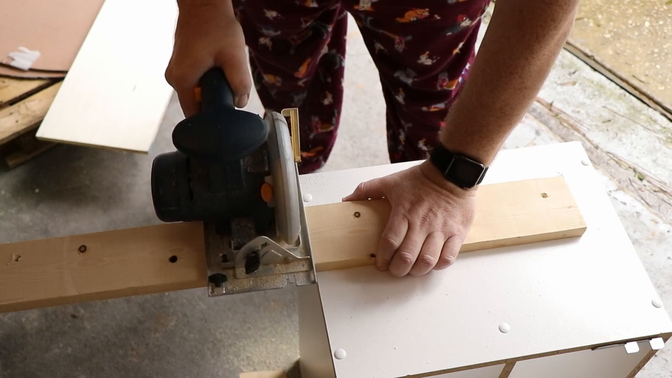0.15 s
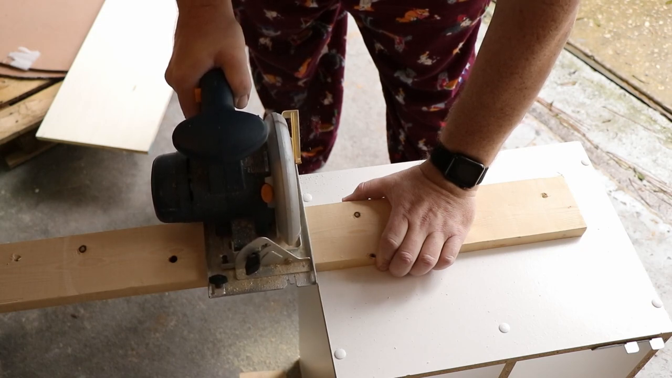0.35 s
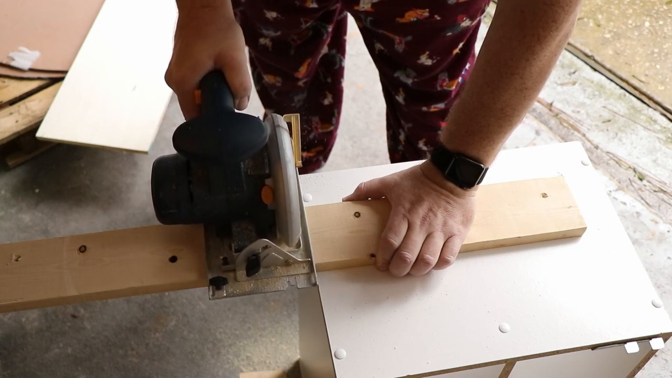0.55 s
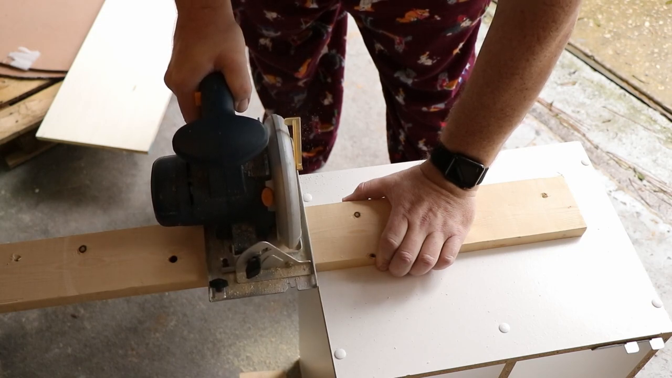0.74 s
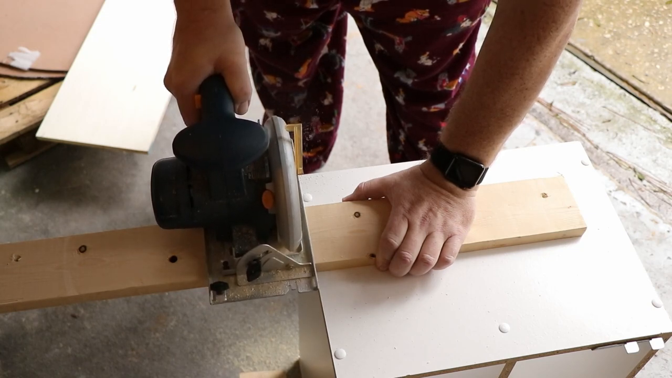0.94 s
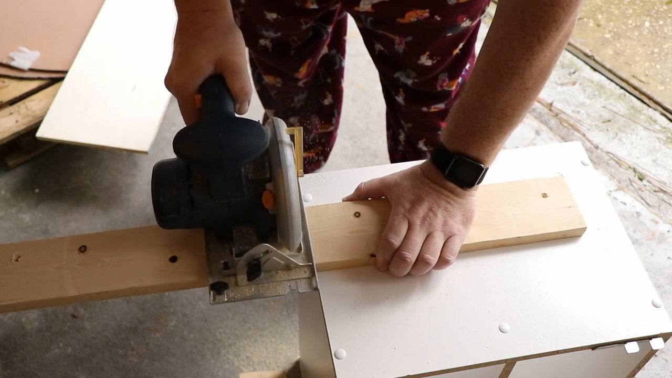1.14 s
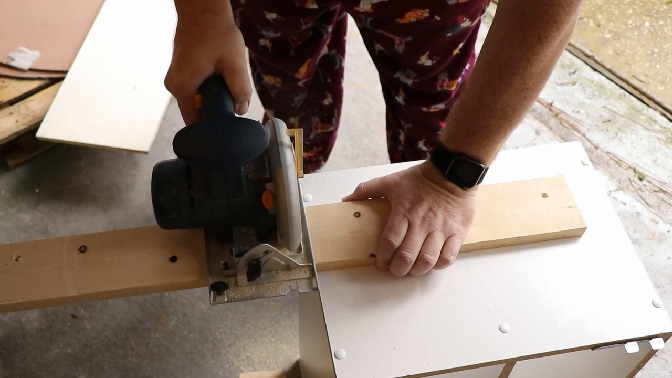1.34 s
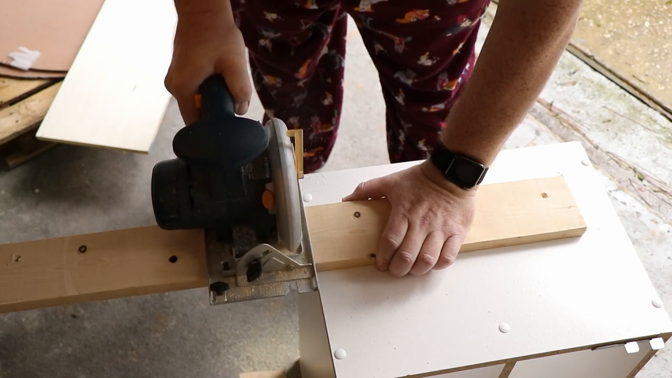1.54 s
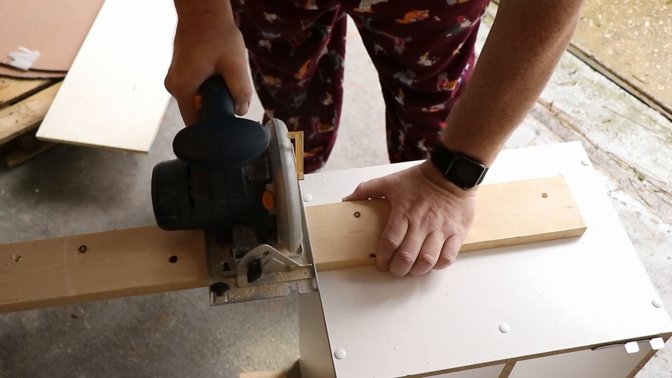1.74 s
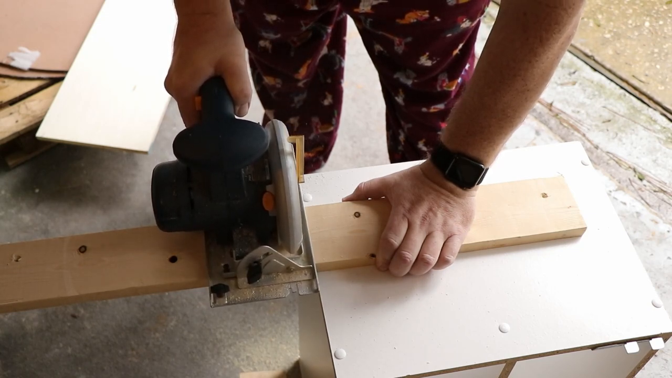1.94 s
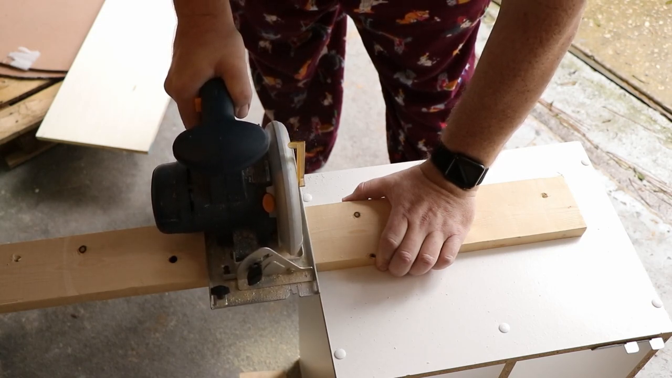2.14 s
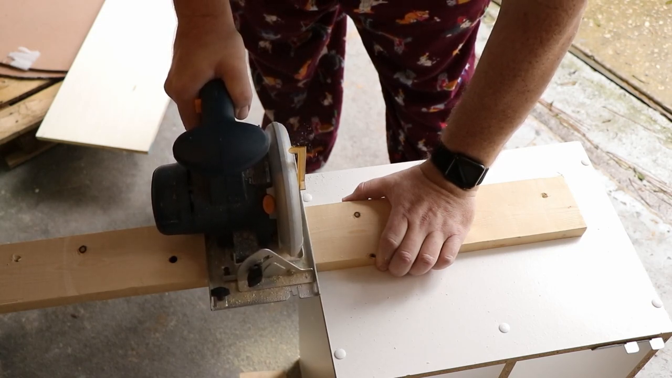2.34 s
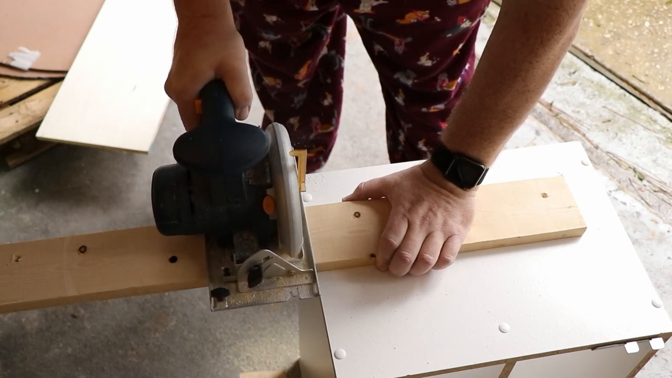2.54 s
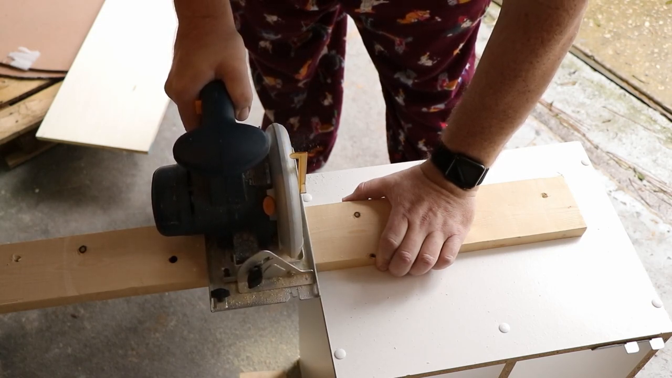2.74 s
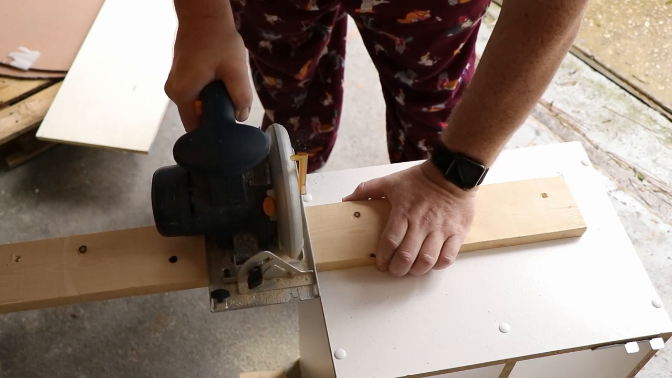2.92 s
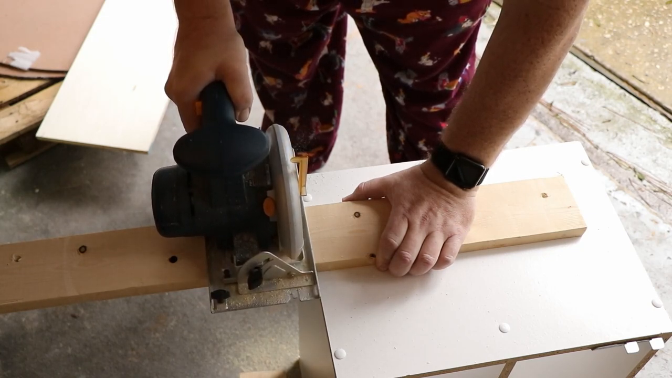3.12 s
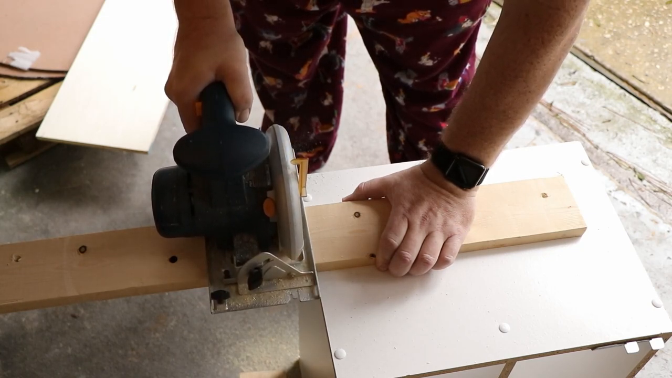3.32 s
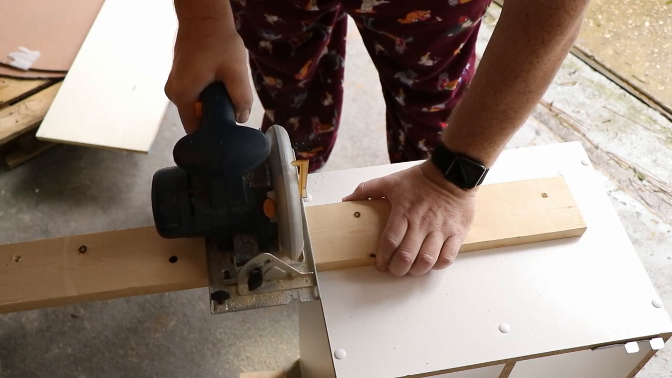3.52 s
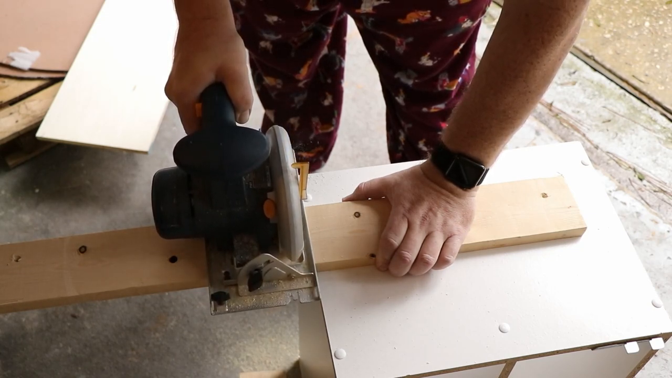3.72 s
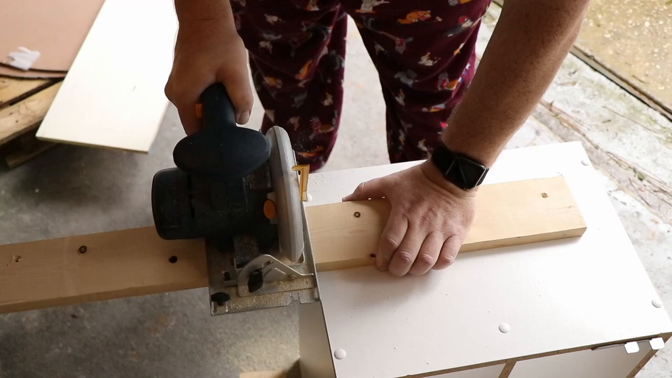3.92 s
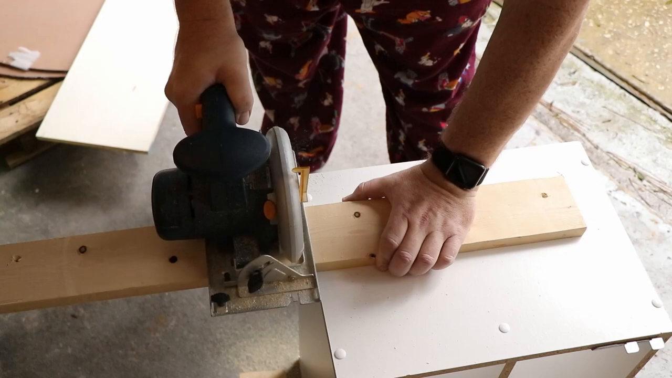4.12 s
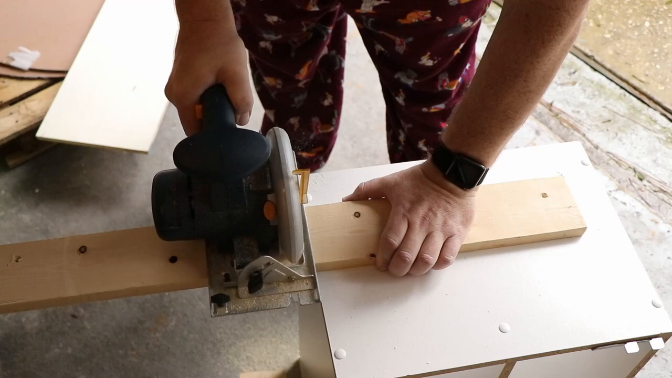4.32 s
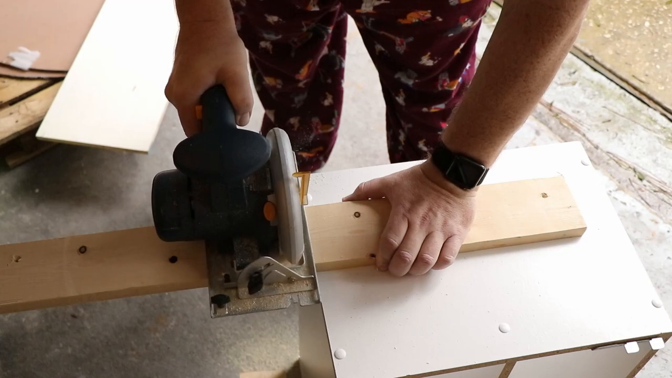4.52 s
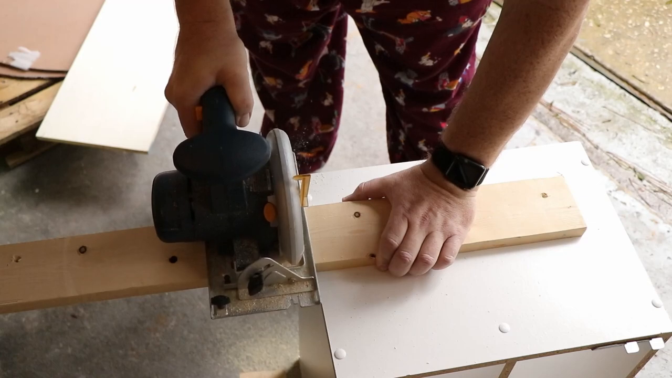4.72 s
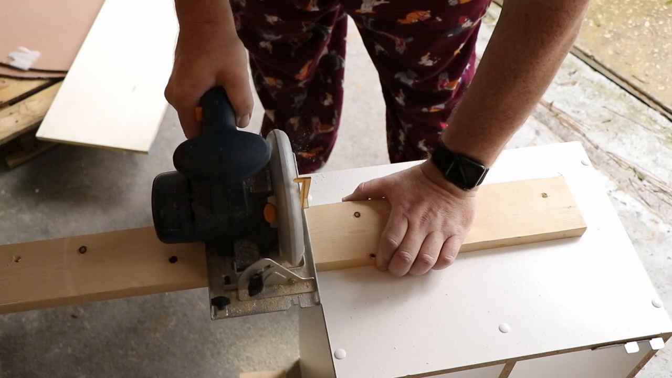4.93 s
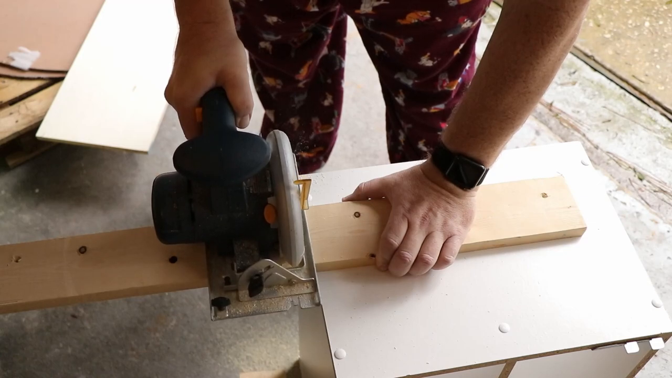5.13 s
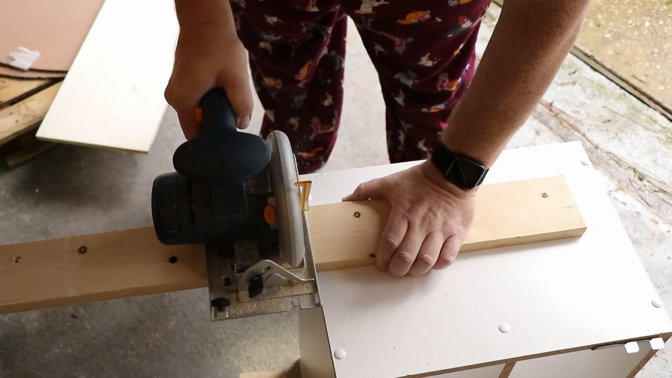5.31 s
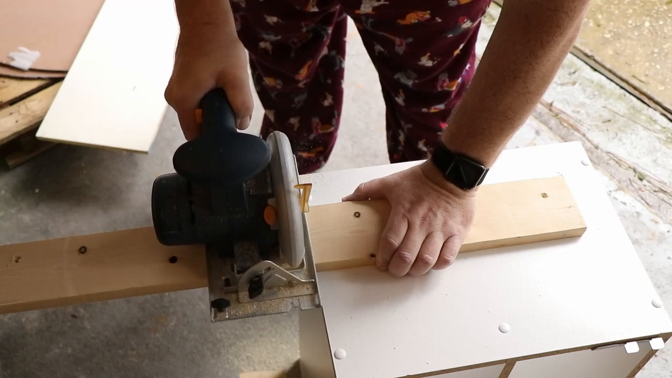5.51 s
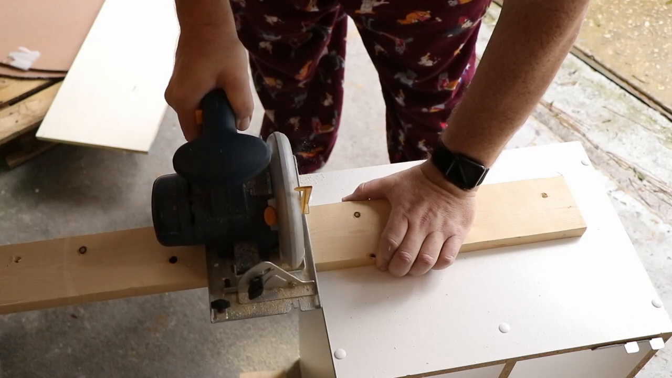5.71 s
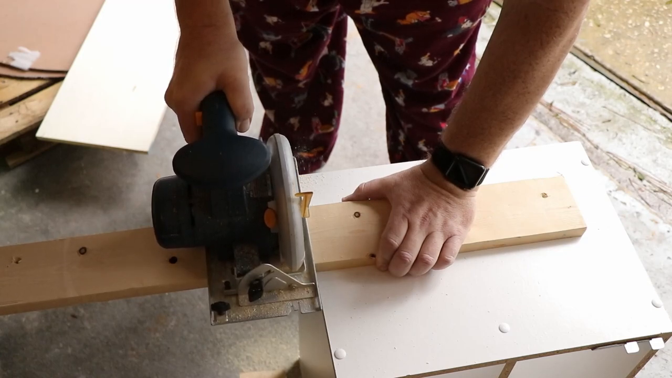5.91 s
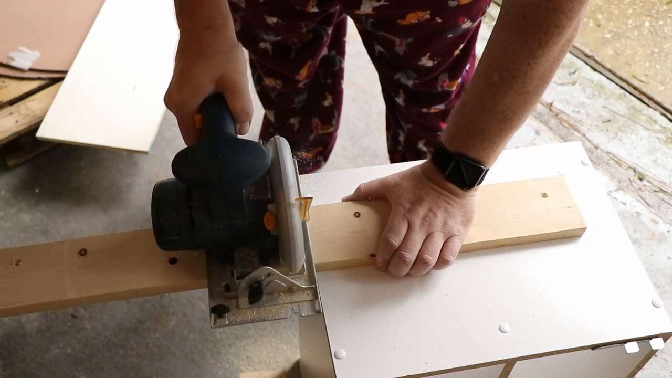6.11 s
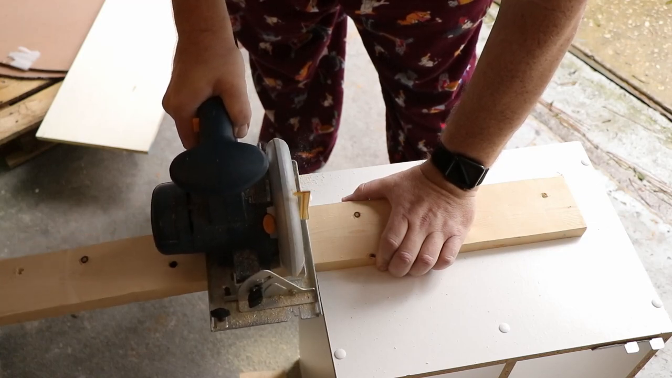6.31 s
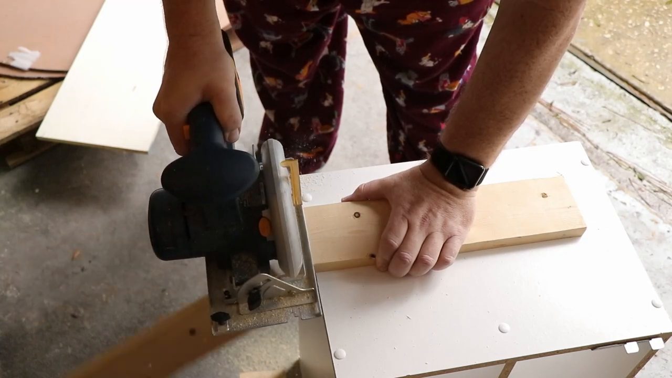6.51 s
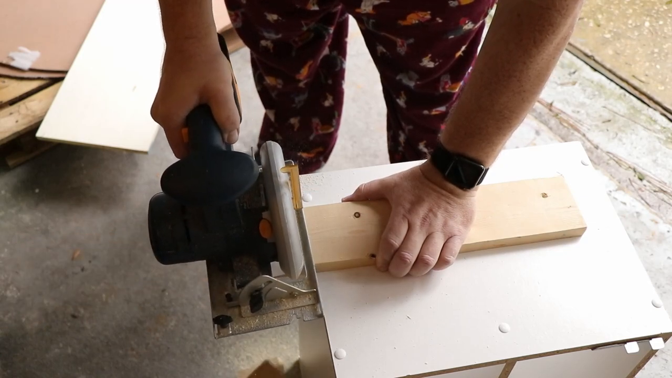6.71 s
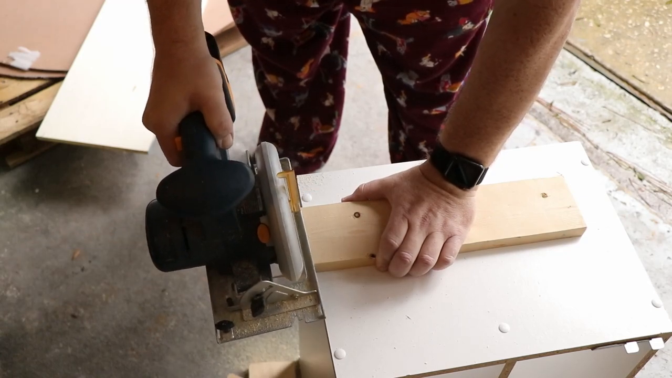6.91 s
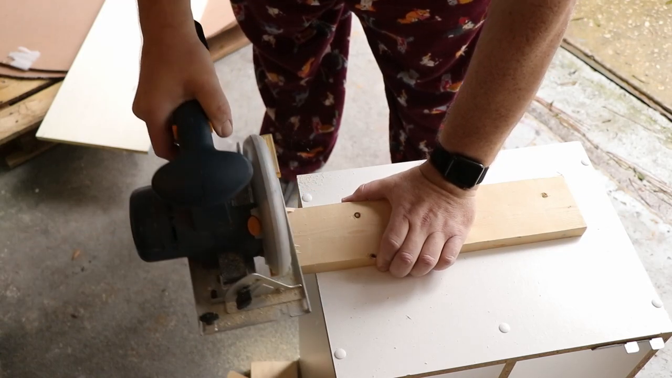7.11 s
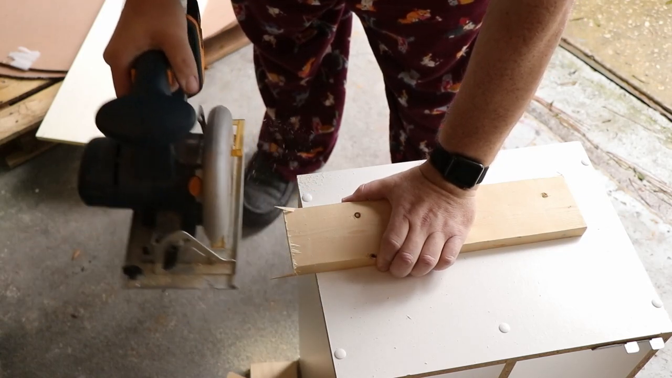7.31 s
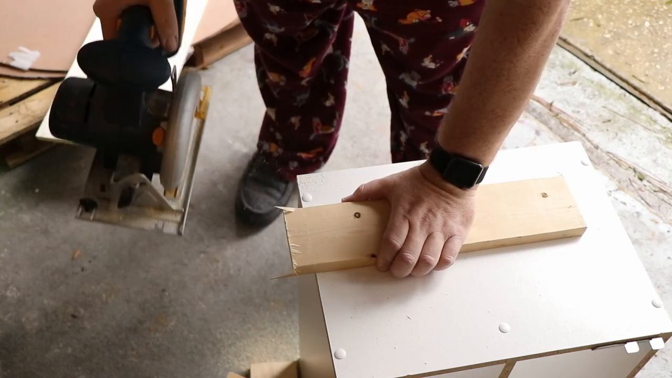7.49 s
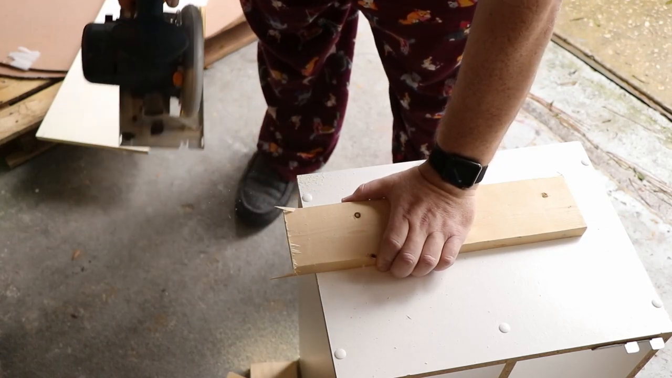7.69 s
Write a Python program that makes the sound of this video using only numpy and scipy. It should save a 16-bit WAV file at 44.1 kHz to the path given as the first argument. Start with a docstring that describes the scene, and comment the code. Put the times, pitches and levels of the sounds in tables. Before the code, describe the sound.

From 0 s a handheld circular saw is already deep in its work, loud and close: a rough, abrasive buzz centred in the middle frequencies, with metallic blade tones, woody rumble and hissing chips. Swells and faint dull bench bumps vary the first 2 s. From about 2 s the cut is steadier and slightly less hissy, its clean gliding tones sinking gradually as the blade labours, lowest around 6.2 s, then picking up a little. At about 6.64 s the board gives way: a very short, rough squeal, crackling fibres and a thump. The cutting roar drops off, and the blade rubs the cut face at 6.77-7.06 s and again around 7.05-7.2 s, singing metallically. A duller wooden knock falls at 6.9 s; a rapid hard clatter follows at 7.3-7.36 s. The blade's ring decays over the still-whirring motor and fan rush. Light garage reverberation; dull top end.

```python
"""Garage: a hand-held circular saw crosscuts a softwood board, close to a small microphone.
Tooth blows, partly repeating each turn, drive resonances of saw, board and blade; chips hiss as noise.
The blade slows under load and its turn orders glide as tones. Tearing fibres crackle, a pinch squeals.
The offcut knocks as decaying modes, the blade rubs the cut face twice and rings out.
The motor is left running free."""
import sys
import numpy as np
from scipy import signal
from scipy.fft import rfft, irfft, next_fast_len
from scipy.io import wavfile
from scipy.ndimage import uniform_filter1d, minimum_filter1d, map_coordinates

SR = 44100
rng = np.random.default_rng(int(sys.argv[2]) if len(sys.argv) > 2 else 0)


def boost_factor(decibels):
    """Convert a level in decibels to a linear amplitude factor."""
    exponent = np.asarray(decibels, float) / 20
    return 10 ** exponent


def unload_audio(sound):
    """Save the sound as a 16-bit wav file, at the path given as the first command line argument."""
    columns = np.transpose(np.atleast_2d(sound))
    # keep every value between -1 and 1, then stretch to whole-number steps
    steps = np.round(np.clip(columns, -1, 1) * 32767)
    wavfile.write(sys.argv[1], SR, steps.astype(np.int16))


N = 341765


def unit(x):
    """Scaled to rms 1."""
    return x / np.sqrt(np.mean(x ** 2) + 1e-20)


def noise():
    """White noise, rms 1."""
    return rng.standard_normal(N)


def along(points, hz):
    """(frequency [Hz], value) points read on a log frequency axis."""
    f, v = np.transpose(points)
    return np.interp(np.log(hz + 1), np.log(f + 1), v)


def curves(rows):
    """One value per sample for each column after the time."""
    s, *cols = np.transpose(rows)
    return [np.interp(np.arange(N) / SR, s, c) for c in cols]


def wobble(rate_hz):
    """Smooth random curve, rate_hz knots a second."""
    knots = rng.standard_normal(int(N * rate_hz / SR) + 4)
    return map_coordinates(knots, [np.arange(N) * rate_hz / SR])


def glide(hz):
    """Sine whose frequency follows the curve hz."""
    return np.sin(2 * np.pi * np.cumsum(hz) / SR)


def filtered(x, response):
    """x times a complex response of frequency."""
    m = next_fast_len(N + SR // 2)
    return irfft(rfft(x, m) * response(np.fft.rfftfreq(m, 1 / SR)), m)[..., :N]


def coloured(x, spectrum):
    """x through a (frequency [Hz], gain [dB]) spectrum, rms 1."""
    return unit(filtered(x, lambda hz: boost_factor(along(spectrum, hz))))


def resonant(x, modes):
    """x through parallel resonances, each applied twice for steep skirts."""
    def response(f):
        total = 0
        for centre_hz, width_hz, db in modes:
            damping = 1.55j * f * width_hz
            total = total + boost_factor(db) * (damping / (centre_hz ** 2 - f * f + damping)) ** 2
        return total
    return filtered(x, response)


# blade speed: (time [s], speed [turns/s])
BLADE_SPEED = [(0.0, 63.0), (0.16, 62.6), (0.47, 64.3), (0.83, 62.6), (1.03, 63.7), (1.3, 62.3),
               (1.75, 63.4), (1.96, 63.2), (2.37, 60.1), (2.51, 59.7), (2.91, 60.0), (3.04, 60.7),
               (3.31, 60.0), (3.8, 59.8), (4.27, 58.8), (4.71, 57.3), (5.39, 56.7), (5.65, 55.5),
               (5.96, 55.3), (6.23, 53.9), (6.32, 54.8), (6.5, 56.6)]


def per_turn(count, drift_hz):
    """Random pattern of orders below count, read at blade speed; it changes drift_hz times a second."""
    size = 2048
    rows = int(N * drift_hz / SR) + 4
    orders = np.zeros((rows, size // 2 + 1), complex)
    orders[:, 1:count] = np.exp(2j * np.pi * rng.random((rows, count - 1)))
    pattern = irfft(orders, size)
    pattern = np.hstack([pattern, pattern[:, :1]])
    angle = np.cumsum(curves(BLADE_SPEED)[0]) / SR % 1
    return unit(map_coordinates(pattern, [np.arange(N) * drift_hz / SR, angle * size], order=1))


# steadiness of the bite: (time [s], swell near 1.5 kHz [dB], swell near 1.9 kHz [dB],
# power share of the force that repeats each turn [0-1])
STEADY_BITE = [(0, -10.5, -16, 0.01), (.15, 4, -10, 0.16), (.33, -2, 3.5, 0.04), (.42, -16, -7, 0.05),
               (.7, -5.5, -4.5, 0.09), (.95, -1, 2.5, 0.14), (1.2, 7, 4, 0.14), (1.32, -2.5, 8.5, 0.1),
               (1.5, 7.5, 5, 0.21), (1.95, -0.5, 0, 0.16), (2.2, -3, 1, 0), (2.5, 3, -5, 0.07),
               (3, 5.5, -4.5, 0.07), (3.5, -2, -5, 0.07), (3.9, -3.5, -0.5, 0.09), (4.35, -1, -5, 0.17),
               (4.48, -4.5, 4, 0.09), (4.9, -8, 6, 0.13), (5.15, -4, 3.5, 0.08), (5.3, -5, -3.5, 0.05),
               (5.6, -2, -5.5, 0.06), (6.05, 0.5, 10, 0.16), (6.2, -4.5, -6, 0.04), (6.5, 3, -6, 0.06)]


def tooth_force(lumps):
    """Tooth blows repeating each turn, mixed by power with noise from torn fibres."""
    teeth = per_turn(count=110, drift_hz=1.468)
    tearing = unit(boost_factor(0.82 * lumps + 0.89 * wobble(30) + 1.2 * wobble(300)) * noise())
    share = np.clip(curves(STEADY_BITE)[2], 0, 1)
    return np.sqrt(share) * teeth + np.sqrt(1 - share) * tearing


# board spectrum: (frequency [Hz], relative level [dB per Hz])
BOARD_SPECTRUM = [(18, -91.5), (30, -41), (134, -44.5), (167, -35.5), (305, -18.5), (385, -14), (466, -4.5),
                  (902, -3.5), (1000, 0.5), (1300, -8), (2200, -120)]
# loose end of the board: (frequency [Hz], width [Hz], gain [dB])
LOOSE_END = [(714, 68, 0)]


def board(force, bite_db, fade_db, rub_board):
    """Board rumble, partly following the bite; the loose end rings in brief contacts."""
    level_db = -35.5 + 0.39 * (bite_db - fade_db + 14.0) + 0.92 * wobble(5.8) + fade_db
    rumbling = (boost_factor(level_db) + rub_board) * coloured(force, BOARD_SPECTRUM)
    return rumbling + boost_factor(-6) * rub_board * unit(resonant(force, LOOSE_END))


# bench shaken by the saw: (frequency [Hz], relative level [dB per Hz])
SHUDDER_SPECTRUM = [(20, -41.5), (40, -13.5), (80, -2.5), (150, 0), (280, 3), (400, -1.5), (700, -52.5)]
# bench shudder before its wobble: (time [s], level [dB])
BENCH_LEVEL = [(0, -53.5), (.6, -67), (1.2, -52), (2.1, -63), (5.6, -65), (6.3, -56.5)]


def bench(fade_db, rub_board):
    """Low noise of the bench shaken by the saw."""
    level = boost_factor(curves(BENCH_LEVEL)[0] + fade_db) + boost_factor(-17) * rub_board
    return level * boost_factor(1.7 * wobble(12)) * coloured(noise(), SHUDDER_SPECTRUM)


# chip hiss: (frequency [Hz], relative level [dB per Hz])
CHIP_SPECTRUM = [(2710, -29.5), (4600, 3), (5630, -1.5), (5970, 0.5), (6350, -4.5), (7640, -5),
                 (8610, -4.5), (9370, -7), (10000, -8.5), (13000, -14.5), (22000, -120)]
# blade flank on the cut face: (frequency [Hz], relative level [dB per Hz])
RUB_SPECTRUM = [(2650, -25), (4500, 0), (5160, -3.5), (6350, -1), (8630, -10), (9350, -8), (10000, -7.5),
                (13000, -38.5), (22000, -120)]


def chips(lumps, hiss_db, rub_hiss):
    """Torn fibres hiss in lumps tied to the turn; the flank hisses on the cut face."""
    spray = boost_factor(2 * lumps + .8 * wobble(14) + 1.5 * wobble(35) + 1.2 * wobble(700))
    hiss = boost_factor(hiss_db + 0.72 * wobble(7)) * coloured(spray * noise(), CHIP_SPECTRUM)
    flank = coloured(boost_factor(lumps + 0.96 * wobble(500)) * noise(), RUB_SPECTRUM)
    return hiss + rub_hiss * flank


# blade modes, one list a group: (frequency [Hz], width [Hz], relative gain [dB])
BLADE_GROUPS = [
    [(1412, 45, -3), (1515, 50, 0), (1620, 90, -6)],
    [(1785, 80, -2), (1885, 60, 0), (2020, 120, -2), (2130, 100, -4)],
    [(2585, 90, -3), (2710, 80, -6), (2870, 100, 0)],
    [(3080, 140, 0), (3210, 120, -1), (3380, 200, -3)],
    [(3560, 200, -10), (3720, 160, -5), (3840, 120, -2), (3990, 160, -4)],
    [(4550, 200, -2), (6345, 140, -13), (8430, 180, -17)],
    [(4140, 90, 0), (4330, 200, 0), (4950, 500, -2)],
]
# each group against the bite: (level deep in the cut [dB], extra while the kerf is shallow [dB], fade [s])
GROUP_RINGING = [(-10.5, 3, .5), (-23, -11.5, 0.74), (-19.5, 6.5, 0.9), (-24, 17, 1.3), (-23, 0.5, .8),
                 (-24.5, 9.5, 3.2), (-28.5, 13.5, 3.3)]
# each group when the blade rubs free of the kerf: level before its wobble [dB]
GROUP_RUB_LEVEL = [0, -14, -10, -17, -6, -28, -24]
# swell of each group with the steady bite: (share of 1.5 kHz swell [1], share of 1.9 kHz swell [1])
GROUP_SWELLS = [(.7, .05), (.05, 0.46), (.05, .1), (.05, 0.045), (.05, .55), (.05, .05), (.05, 0.056)]
# clearest high blade mode: (frequency [Hz], width [Hz], gain [dB])
WHINE_MODE = [(3985, 90, 0)]
# that mode before its wobble: (time [s], level [dB])
WHINE_CURVE = [(0, -44), (.5, -41), (1.1, -35), (1.8, -35), (2.15, -38), (2.5, -37.5), (2.9, -35.5),
               (3.6, -37), (4.3, -42), (4.9, -36), (5.25, -44), (5.8, -41), (5.95, -35), (6.25, -36),
               (6.5, -38), (6.62, -36), (6.68, -29), (6.7, -34), (6.76, -36), (7.15, -35), (7.3, -60)]


def blade(force, bite, rub_ring):
    """Blade modes driven by the tooth force, gripped in the kerf or rubbing free."""
    t, out = np.arange(N) / SR, 0
    swells_db = np.array(GROUP_SWELLS) @ curves(STEADY_BITE)[:2]
    groups = zip(GROUP_RINGING, GROUP_RUB_LEVEL, BLADE_GROUPS, swells_db)
    for (deep_db, shallow_db, shallow_s), free_db, modes, swell_db in groups:
        kerf_db = deep_db + shallow_db * np.exp(-(t / shallow_s) ** 2)
        grip_db = 1.8 * wobble(6)
        gripped = bite * boost_factor(kerf_db + swell_db + grip_db)
        free = rub_ring * boost_factor(free_db + 2.2 * wobble(18))
        out = out + resonant((gripped + free) * force, modes) / np.std(resonant(force, modes))
    whine_gain = boost_factor(curves(WHINE_CURVE)[0] + 1.3 * wobble(12))
    return out + whine_gain * unit(resonant(force, WHINE_MODE))


# cut levels before wobble and end fade: (time [s], bite [dB], chip hiss [dB])
CUT_LEVELS = [(0.0, -16, -34.5), (0.11, -18, -31.5), (0.41, -17.5, -35.5), (0.66, -18, -38.5),
              (0.77, -14, -35), (1.2, -16.5, -34), (1.69, -17.5, -35), (2.08, -20.5, -39),
              (2.4, -18.5, -40), (2.76, -18, -37.5), (3.4, -18.5, -39.5), (3.95, -17.5, -37.5),
              (4.3, -19, -40.5), (4.7, -16.5, -35), (5.25, -20, -37.5), (5.6, -19, -34.5),
              (6.09, -15.5, -32.5), (6.36, -17, -35.5), (6.45, -15.5, -35.5), (6.51, -21, -36.5),
              (6.6, -17.5, -39), (6.64, -15.5, -39.5)]
# saw and kerf: (frequency [Hz], relative level [dB per Hz])
BODY_SPECTRUM = [(290, -48), (500, -32.5), (909, -24), (1110, -5), (1530, -0.5), (1700, -3), (2010, -1.5),
                 (2420, -12), (2830, -8.5), (3150, -15.5), (3510, -15.5), (3990, -11.5), (5200, -24),
                 (6760, -25.5), (11400, -120)]


def cut():
    """One tooth force shakes saw, board and blade, beside bench and chip noise; all fade as wood runs out."""
    clear_s, clear_db_per_s = 6.66, 110
    fade_db = -clear_db_per_s * np.maximum(np.arange(N) / SR - clear_s, 0)
    bite_db, hiss_db = curves(CUT_LEVELS) + fade_db
    rub_bite, rub_hiss, rub_board, rub_ring = contacts()
    lumps = per_turn(count=5, drift_hz=2.49)  # the blade wobbles: some teeth cut deeper
    force = tooth_force(lumps)
    bite = boost_factor(bite_db + 0.6 * wobble(3.98) + 0.52 * wobble(16))
    body = (bite + rub_bite) * coloured(force, BODY_SPECTRUM)
    wood = board(force, bite_db, fade_db, rub_board) + bench(fade_db, rub_board)
    return body + wood + chips(lumps, hiss_db, rub_hiss) + blade(force, bite, rub_ring)


# clean turn orders: {multiple of the turn: level before swells and mode lift [dB]}
TURN_ORDERS = {3: -61.5, 4: -71.5, 5: -67, 6: -64.5, 7: -59, 8: -57.5, 9: -60, 10: -60.5, 11: -56.5, 12:
               -50, 13: -50, 15: -52.5, 22: -38.5, 23: -41.5, 24: -44.5, 25: -48, 26: -44.5, 27: -40, 28:
               -44, 29: -40.5, 30: -49, 31: -45.5, 32: -47.5, 33: -40.5, 34: -40.5, 35: -42.5}
# lift passing a board or blade mode: (frequency [Hz], width [Hz], gain added to 1 [dB])
LIFT_MODES = [(398, 28, 8.5), (471, 60, 9.5), (710, 80, 1.5), (1483, 75, 8.5), (1516, 56, 15),
              (1555, 43, 6.5), (1802, 85, 8), (1900, 48, 6)]
# offset of orders below 20, before wobble: (time [s], level [dB])
LOW_ORDER_LEVEL = [(0, -7), (2.2, -5.5), (2.5, -1), (2.9, -4), (4.1, -5), (4.35, -0.5), (5.6, -1),
                   (5.8, -9), (6.05, 3), (6.5, -3.5)]


def hum():
    """Turn orders glide as clean tones while the blade is in the board, loudest near board or blade modes."""
    t, (speed,) = np.arange(N) / SR, curves(BLADE_SPEED)
    phase = 2 * np.pi * np.cumsum(speed) / SR
    in_board = np.clip((6.53 - t) / 0.049, 0, 1)
    low_db, = curves(LOW_ORDER_LEVEL)
    out, (lower_db, upper_db, _) = 0, curves(STEADY_BITE)
    for k, db in TURN_ORDERS.items():
        lift = 1
        for hz, width_hz, lift_db in LIFT_MODES:
            lift = lift + boost_factor(lift_db) / (1 + (2 * (k * speed - hz) / width_hz) ** 2)
        if k < 20:
            swell_db = low_db + 1.2 * wobble(4)
        else:
            swell_db = np.where(k * speed < 1680, lower_db, upper_db) + 1.2 * wobble(7)
        out = out + boost_factor(db + swell_db) * lift * np.sin(k * phase)
    return np.sqrt(2) * in_board * out


# motor housing: (frequency [Hz], width [Hz], relative gain [dB])
HOUSING_MODES = [(603, 45, -12), (1420, 110, -5), (2690, 60, -14), (3860, 110, -11), (5510, 150, -34),
                 (6210, 150, -33), (8600, 450, -26)]
# steady whine before wobble and load: (frequency [Hz], level [dB])
MOTOR_TONES = [(1163, -38.5), (2013, -49), (2056, -42), (2094, -43), (3935, -53), (6207, -68)]
# cooling air: (frequency [Hz], relative level [dB per Hz])
FAN_SPECTRUM = [(120, -66), (200, -32.5), (932, -11), (1150, -4), (1760, -11), (2080, -13), (2410, -15.5),
                (3930, -21.5), (4870, -34.5), (6400, -35), (7600, -42), (8630, -36), (10000, -36.5),
                (13000, -77.5), (22000, -120)]


def motor():
    """Brush and gear noise sings in the housing over the fan's rush; free of load it is louder."""
    whine = unit(resonant(boost_factor(3.9 * wobble(25)) * noise(), HOUSING_MODES))
    tones = 0
    for hz, db in MOTOR_TONES:
        gain = np.sqrt(2) * boost_factor(db + 1.8 * wobble(25))
        tones = tones + gain * glide(hz * (1 + .0012 * wobble(30)))
    rush = boost_factor(1.8 * wobble(35)) * coloured(boost_factor(1.2 * wobble(250)) * noise(), FAN_SPECTRUM)
    load_db = np.interp(np.arange(N) / SR, [6.3, 7.1], [-8, 0])
    return boost_factor(load_db) * (boost_factor(-41.5) * whine + tones + boost_factor(-33.5) * rush)


# low rumble of the place: (frequency [Hz], relative level [dB per Hz])
RUMBLE_SPECTRUM = [(40, -32), (70, -9), (90, -12), (115, -5), (160, -12), (250, -36.5)]


def rumble():
    """Faint low noise that swells towards the end."""
    level_db = np.interp(np.arange(N) / SR, [6.3, 7.2], [-70, -60])
    return boost_factor(level_db) * coloured(noise(), RUMBLE_SPECTRUM)


# room decay: (frequency [Hz], t60 [s])
GARAGE_DECAY = [(200, 0.6), (2000, 0.53), (10000, 0.42)]


def garage(x):
    """Room reverberation: a noise tail in which each frequency dies at its own speed."""
    hz, t, z = signal.stft(rng.standard_normal(SR // 2), SR, nperseg=256)
    decay = boost_factor(-60 * t / along(GARAGE_DECAY, hz)[:, None])
    tail = signal.istft(z * decay, SR, nperseg=256)[1]
    return signal.fftconvolve(np.pad(x, (400, 0)), tail / np.linalg.norm(tail))[:N]


# bench jolts: (time [s], level before a 1 dB cut [dB])
BENCH_JOLTS = [(0.765, -43), (0.859, -56), (1.03, -47), (1.157, -42), (1.203, -43), (1.314, -52),
               (1.467, -49), (1.79, -49), (6.658, -30)]


def thumps():
    """Dull bench jolts: low noise that rises in 11 ms and dies."""
    t, t60_s, shape = np.arange(N) / SR, .14, 0
    for s, db in BENCH_JOLTS:
        rise = np.clip((t - s) / 0.011, 0, 1)
        shape = shape + boost_factor(db - 1 - 60 * np.abs(t - s) / t60_s) * rise
    return shape * coloured(noise(), SHUDDER_SPECTRUM)


# the board sags, tears off and spits chips, the blade rubs the cut face twice over,
# the offcut scrapes the floor: (time [s], length [s], rise [s], fall [dB/s],
# bite [dB], hiss [dB], board [dB], blade ring [dB])
BRIEF_CONTACTS = [(6.177, 0.046, 0.029, 304, -64, -59.5, -50, -60),
                  (6.637, .05, .005, 800, -17, -26, -33, -26),
                  (6.641, .042, .012, 1100, -60, -20, -27, -30),
                  (6.767, 0.29, 0.014, 498, -16, -28.5, -31.5, -18.5),
                  (7.053, 0.14, 0.038, 330, -17.5, -26.5, -32, -17.5),
                  (7.293, 0.02, 0.0052, 400, -25, -67, -33, -64)]


def contacts():
    """Gains of bite, hiss, board and ring for brief contacts: rise, hold, fall."""
    t, out = np.arange(N) / SR, 0
    for s, length_s, rise_s, fall_db_per_s, *db in BRIEF_CONTACTS:
        fall = boost_factor(-fall_db_per_s * np.maximum(t - s - length_s, 0))
        shape = np.clip((t - s) / rise_s, 0, 1) * fall
        out = out + boost_factor(np.array(db))[:, None] * shape
    return out


def swell_and_fade(start_s, length_s):
    """Flat-topped arch from 0 to 1 and back."""
    u = np.clip((np.arange(N) / SR - start_s) / length_s, 0, 1)
    return np.abs(np.sin(np.pi * u)) ** .3


# breaking board pinches the blade: (time [s], length [s], frequency [Hz], level before arch and wobble [dB])
PINCH = (6.636, .062, 1772, -8)


def squeal():
    """Short rough whistle of the pinched blade: a sine unsteady in pitch and level."""
    s, length_s, hz, db = PINCH
    gain = np.sqrt(2) * swell_and_fade(s, length_s) * boost_factor(db + .8 * wobble(80))
    return gain * glide(hz * (1 + .005 * wobble(60)))


# last fibres ripping: (frequency [Hz], relative level [dB per Hz])
TEAR_SPECTRUM = [(1500, -30), (2600, -4), (3900, 1), (5500, -7.5), (9000, -21), (13000, -40)]
# (time [s], length [s], level before the arch [dB])
TEAR_EVENT = (6.638, .052, -21)


def tear():
    """Last fibres rip as the board lets go: dense crackle of fast-varying noise."""
    s, length_s, db = TEAR_EVENT
    crackle = coloured(boost_factor(3 * wobble(600)) * noise(), TEAR_SPECTRUM)
    return boost_factor(db) * swell_and_fade(s, length_s) * crackle


# offcut blows: (time [s], level before a 1.5 dB lift [dB], favoured frequency [Hz], rise constant [s])
OFFCUT_KNOCKS = [(6.911, -14, 450, 0.0055), (7.293, -29, 430, 0.0032), (7.2981, -18, 1120, 0.00073),
                 (7.3054, -6.5, 1180, 0.0014), (7.3175, -14, 1900, .0004), (7.3311, -22, 1300, 0.00056),
                 (7.342, -22, 1190, .001), (7.36, -15.5, 2110, .002)]
# loose plank modes: (frequency [Hz], relative level [dB], t60 [s])
WOOD_MODES = [(160, -4, .1), (330, -8, .08), (400, -1, .08), (445, 0, .09), (540, -4, .08), (720, -7, .08),
              (950, -3, .03), (1060, -2, .035), (1250, -3, .03), (1500, -5, .025), (1900, -6, .03),
              (2110, -3, .04), (3000, -6, .02)]


def offcut():
    """Each knock rings the loose plank, most in modes near the blow's favoured frequency."""
    crack_db, crack_t60_s = -14, .012
    out, t = np.zeros(N + SR), np.arange(SR // 4) / SR
    for s, db, near_hz, rise_s in OFFCUT_KNOCKS:
        ring = 0
        for hz, mode_db, t60_s in WOOD_MODES:
            level_db = mode_db + rng.normal(0, 1.0) - 13.0 * np.log2(hz / near_hz) ** 2
            ring = ring + boost_factor(level_db - 60 * t / t60_s) * np.sin(2 * np.pi * hz * t)
        if near_hz > 900:  # hard blows clack
            ring = ring + boost_factor(crack_db - 60 * t / crack_t60_s) * rng.standard_normal(len(t))
        out[round(s * SR):][:len(t)] += boost_factor(db + 1.5) * ring * (1 - np.exp(-t / rise_s))
    return out[:N]


# blade clear of the wood: (frequency [Hz], relative level [dB], t60 [s])
FREE_BLADE = [(1522, 0, 0.54), (1700, -11, 0.55), (1900, -28, .1), (2640, -22, .36), (2737, -16, 0.35),
              (2763, -13.5, 0.54), (3000, -25, 0.76), (3360, -29, 0.51), (3740, -27, .5), (3780, -20, .19)]


def ring_out():
    """Rubbed into song, free blade modes swell and decay; the closing guard chokes them by up to 14 dB."""
    release_s, damped_s, damped_db_per_s = 7.2, 7.3, 220
    t = np.arange(N) / SR
    after = t - release_s
    swell = np.clip(1 + after / .06, 0, 1)
    choke = boost_factor(-np.clip(damped_db_per_s * (t - damped_s), 0, 14))
    ring = 0
    for hz, db, t60_s in FREE_BLADE:
        decay = boost_factor(db - 60 * np.maximum(after, 0) / t60_s)
        ring = ring + decay * np.sin(2 * np.pi * (hz * after + rng.random()))
    return boost_factor(-11) * swell * choke * ring


def scene():
    """Saw and offcut, near, with a little room."""
    saw = cut() + hum() + motor() + squeal() + tear() + ring_out()
    wood = offcut()
    room = boost_factor(-14.5) * garage(saw) + boost_factor(-10.0) * garage(wood)
    return (saw + wood + rumble() + thumps() + room)[None]


def top_cut(x):
    """Nothing passes above the cut-off."""
    return signal.sosfilt(signal.butter(12, 10170, fs=SR, output="sos"), x)


def record(dry):
    """Fast limiter holds the peaks; the microphone cuts deep bass and all above its band limit."""
    ceiling, window, bass_hz, top_hz = .47, 71, 90, 9936  # window in samples
    needed = np.minimum(1, ceiling / (np.abs(dry) + 1e-9))
    limited = dry * uniform_filter1d(minimum_filter1d(needed, size=window), size=window)
    mix = filtered(limited, lambda hz: (1j * hz / (1j * hz + bass_hz)) ** 2)
    mix = filtered(mix, lambda hz: 1 / (1 + (hz / top_hz) ** 120))
    return top_cut(mix)


dry = scene()
out = record(dry)
unload_audio(out)
```